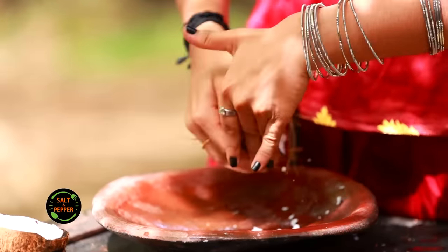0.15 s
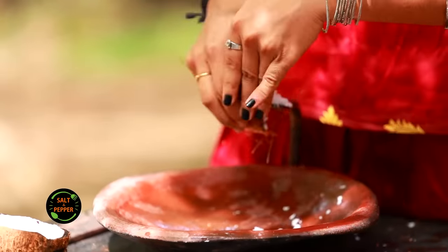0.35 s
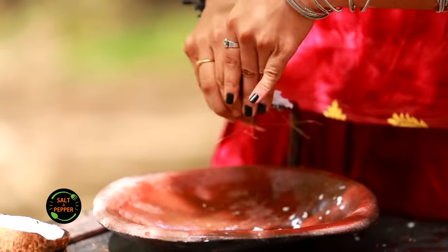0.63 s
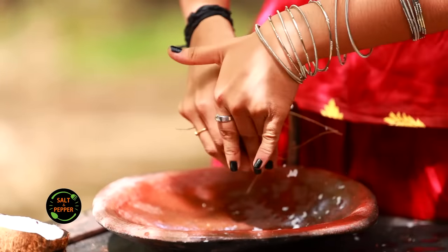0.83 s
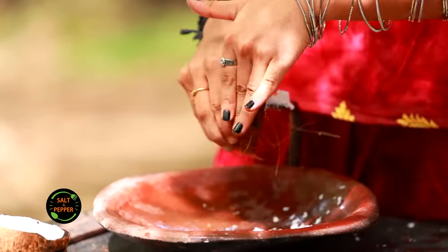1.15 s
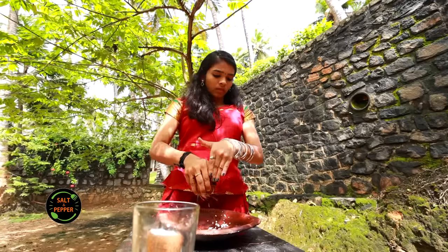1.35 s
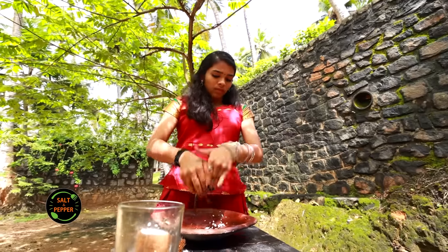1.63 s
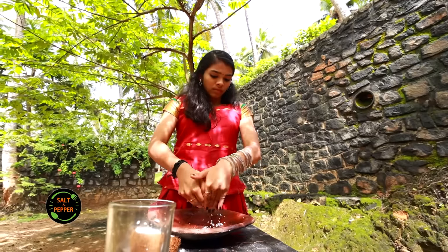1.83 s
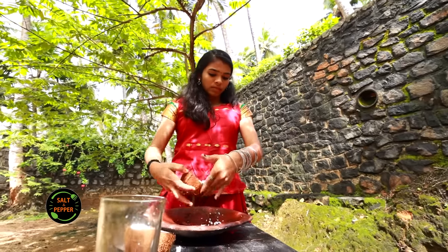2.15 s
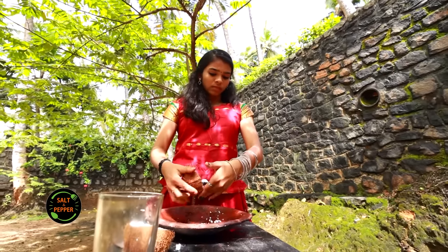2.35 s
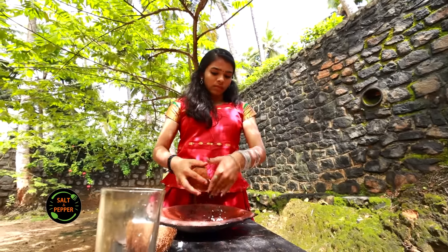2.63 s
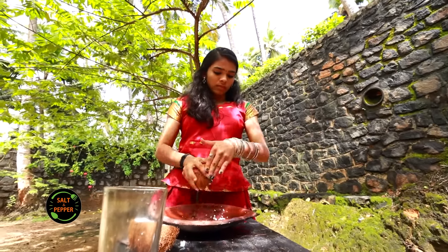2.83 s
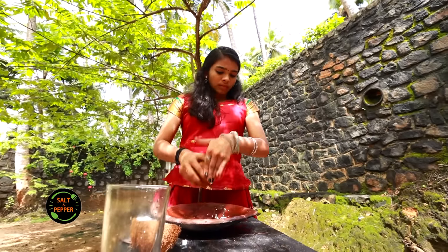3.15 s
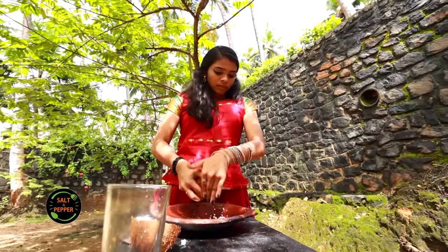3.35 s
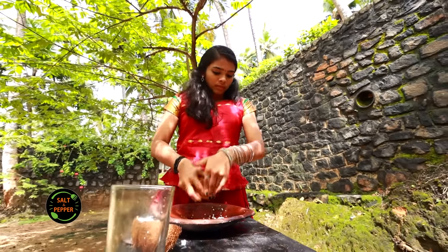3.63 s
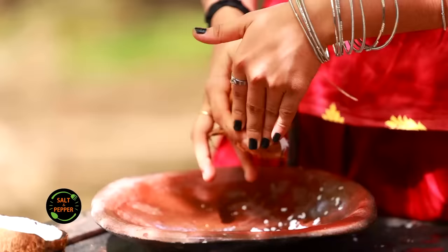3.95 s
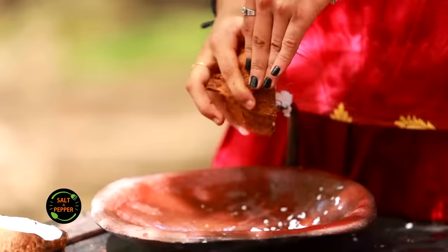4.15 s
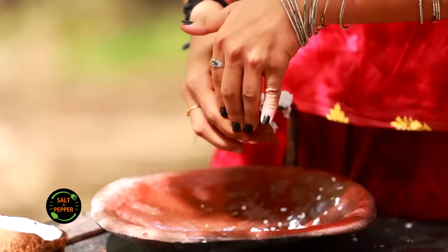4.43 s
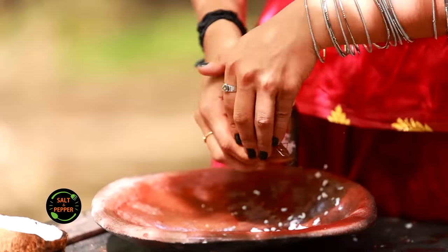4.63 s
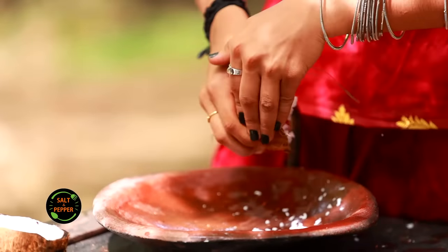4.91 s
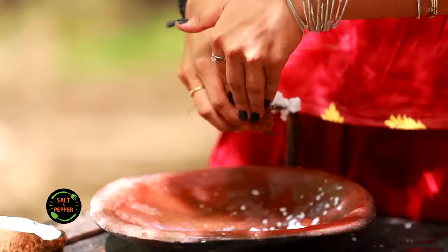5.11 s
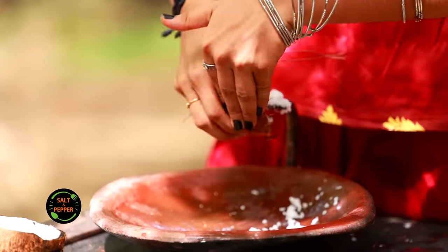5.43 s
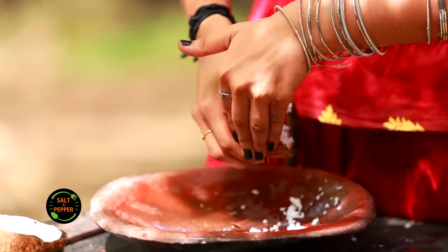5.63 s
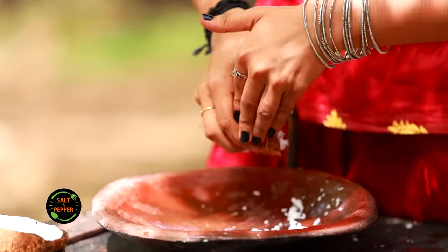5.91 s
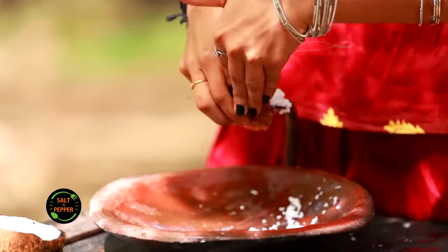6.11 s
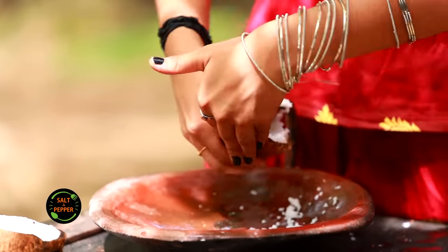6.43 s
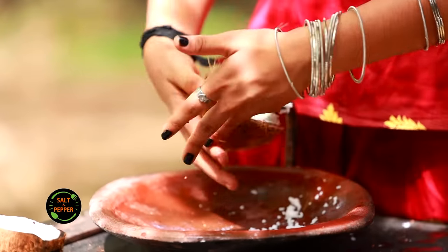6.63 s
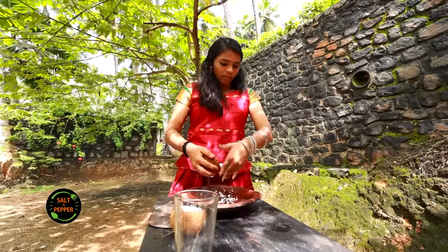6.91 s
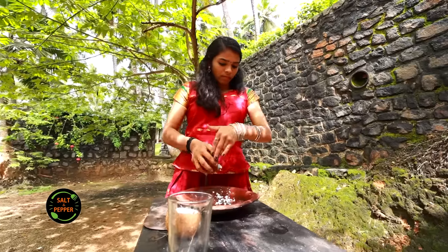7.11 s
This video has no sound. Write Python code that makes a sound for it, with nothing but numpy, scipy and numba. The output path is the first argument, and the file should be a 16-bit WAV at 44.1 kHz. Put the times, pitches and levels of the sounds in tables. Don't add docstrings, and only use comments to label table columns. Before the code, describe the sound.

A close, dry outdoor sound of coconut scraping, with a faint, wide garden hum and leaf hiss behind. From the start dry husk crackles under busy hands, and a faint far bird note sounds. By 0.2 seconds thin bangles clink and the first toothed scrape tears the flesh, ringing the hollow shell and more lightly the steel blade. Short rough strokes follow about every third of a second until 1.95, with low board thuds and high jingling. A distant bird whistles in sliding notes from 1.2 to 2.6. From 2.2 to 3.0 the pushing rests, with only weak clinks and finger rustles. Three strong strokes return at 3.05 to 3.8; a new grip rustles at 4.2. Brisk scraping and jingling continue from 4.3 to 6.5. At 6.55 the shell knocks dryly on steel, bangles tinkle out, and fingers rustle last around 7.2.

```python
import sys
import numpy as np
from scipy import signal
from scipy.fft import rfft, irfft, next_fast_len
from scipy.io import wavfile
from scipy.ndimage import uniform_filter1d
from numba import njit

SR = 44100
rng = np.random.default_rng(int(sys.argv[2]) if len(sys.argv) > 2 else 0)


def dump_mix(stems):
    frames = np.atleast_2d(stems).T
    limited = np.clip(frames, -1, 1)
    pcm = np.round(limited * 32767).astype(np.int16)
    wavfile.write(sys.argv[1], SR, pcm)


def boost_factor(decibels):
    exponent = np.asarray(decibels, float) / 20
    return 10 ** exponent


N = 320166
STEP = 1024


def curve(rows, outside=-120):
    s, *columns = np.transpose(rows)
    span = np.arange(int(s[0] * SR), min(int(s[-1] * SR) + 1, N))
    out = np.full((len(columns), N), 1. * outside)
    out[:, span] = [np.interp(span / SR, s, c) for c in columns]
    return out


def unit(x):
    return x / np.sqrt(np.mean(x ** 2))


def colour(x, points):
    hz, db = np.transpose(points)
    size = next_fast_len(N, True)
    f = np.maximum(np.arange(size // 2 + 1) * SR / size, 1)
    gain = boost_factor(np.interp(np.log(f), np.log(hz), db))
    return irfft(rfft(x, size) * gain, size)[:N]


def grains(per_s, spread_db):
    at = np.flatnonzero(rng.random(N) < per_s / SR)
    out = np.zeros(N)
    out[at] = rng.choice([-1, 1], len(at)) * boost_factor(spread_db * rng.standard_exponential(len(at)))
    return out


def flutter(per_s):
    k = int(SR / per_s)
    steps = np.repeat(rng.standard_normal(N // k + 1), k)[:N]
    return unit(uniform_filter1d(steps, k))


def held(steps):
    count = N // STEP + 1
    values = np.repeat(rng.standard_normal(count), steps)[:count]
    return np.roll(values, rng.integers(steps))


@njit
def ring(force, pole, gain, step):
    out, z = np.empty(len(force)), 0j
    for i in range(len(force)):
        z = z * pole[i // step] + force[i] * gain[i // step]
        out[i] = z.imag
    return out


def mode(x, hz, width_hz, drift=0., grip_db=0., vary_db=0.):
    moving_hz = hz * (1 + drift * held(2))
    moving_width = width_hz * boost_factor(grip_db * held(2))
    pole = np.exp((2j * moving_hz - moving_width) * np.pi / SR)
    return ring(x, pole, boost_factor(vary_db * held(2)), STEP)


def body(x, modes, drift=.015, vary_db=1.6, lift=lambda hz: 1):
    out = np.zeros(N)
    for k, (hz, width, db) in enumerate(modes):
        sound = mode(x * lift(hz), hz, width, drift, 1.96, vary_db)
        out += (-1) ** k * boost_factor(db) * width * sound
    return unit(out)


# pitch_hz [Hz], level_db [dB per Hz]
GARDEN_COLOUR = [(12, -37), (20, -9.5), (154, 3), (357, -10), (499, -17.5), (590, -9.5), (897, -10.5),
                 (1150, -19.5), (2080, -29.5), (6540, -30), (9400, -41), (11800, -39), (16000, -44)]
# time_s [s], level_db [dB]
GARDEN_SWELL = [(0.0, -59), (1.29, -61.5), (3.66, -60.5), (5.03, -62), (5.5, -61), (6.35, -64), (7.26, -59)]
# pitch_hz [Hz], side_minus_mid_db [dB]
GARDEN_WIDTH = [(25, -20), (120, -12), (700, -2), (3000, -2), (9000, 0), (14000, -1)]


def garden():
    swell, = curve(GARDEN_SWELL, outside=GARDEN_SWELL[-1][1])
    gain = boost_factor(-52.5 + 1.03 * (swell - swell.mean()) + 0.091 * flutter(6.6))
    mid, other = (unit(colour(rng.standard_normal(N), GARDEN_COLOUR)) for _ in range(2))
    side = 0.12 * mid + colour(other, GARDEN_WIDTH)
    return gain * np.array([mid + side, mid - side])


# time_s [s], pitch_hz [Hz], level_db [dB]
BIRD_NOTES = [
    [(1.2, 4970, -58), (1.27, 4660, -44), (1.38, 4330, -60), (1.48, 4070, -61), (1.8, 3920, -55),
     (1.85, 3900, -77)],
    [(1.52, 2840, -88), (1.62, 3166, -48), (1.8, 3110, -60), (1.84, 3150, -77)],
    [(1.2, 3390, -47.5), (1.32, 3560, -77), (1.5, 3430, -87)],
    [(0, 2830, -57), (.12, 2600, -59), (.2, 2700, -83)],
    [(2.0, 2760, -63), (2.08, 2878, -71), (2.45, 2740, -77), (2.6, 2780, -93)],
]


def bird():
    out = np.zeros(N)
    for note in BIRD_NOTES:
        hz, db = curve(note)
        hz = np.abs(hz) * (1 + .005 * flutter(80))
        out += boost_factor(db + 3.4 * flutter(39.9)) * np.sin(2 * np.pi * np.cumsum(hz) / SR)
    lag = np.arange(SR // 2) / SR
    echoes = rng.standard_normal(len(lag)) * np.exp(-lag / 0.12)
    return boost_factor(-4) * out + boost_factor(-37) * signal.fftconvolve(out, echoes)[:N]


# time_s [s], husk_crackle_db [dB]
BUSY_HANDS = [(0, -58), (.3, -53), (1.25, -54.5), (1.37, -61), (1.5, -61), (1.7, -53), (1.96, -54.5),
              (2.3, -65.5), (2.92, -70), (3.21, -52.5), (3.92, -55), (4.12, -75), (4.2, -61.5),
              (4.6, -53.5), (6.3, -53.5), (6.62, -58.5), (6.9, -74), (7.26, -64.5)]


def busy_hands():
    level_db, = curve(BUSY_HANDS, outside=BUSY_HANDS[-1][1])
    return level_db


# pitch_hz [Hz], width_hz [Hz], level_db [dB]
FIBRES = [(4530, 1410, -3.5), (6480, 1780, 0), (8160, 2250, 2.5), (10820, 2750, 1.5), (12680, 2670, -3),
          (14000, 1700, -9)]


def crackle(db, rough_db):
    snaps = unit(grains(2800, 1.87)) * boost_factor(rough_db * flutter(50))
    thin = signal.butter(3, 2800, "high", fs=SR, output="sos")
    patchy = body(snaps, FIBRES, drift=.03, vary_db=1.2)
    return unit(signal.sosfilt(thin, patchy)) * boost_factor(db + 8.0)


# start_s [s], crackle_db [dB]
RUSTLES = [
    (2.72, -54),
    (2.82, -56),
    (2.96, -75),
    (4.185, -50),
    (7.04, -58),
    (7.206, -48),
]


def grip():
    s, db = np.transpose(RUSTLES)
    push, lag = np.zeros(N), np.arange(SR // 4) / SR
    push[(s * SR).astype(int)] = boost_factor(db)
    rise_s, fade_s = 0.018, 0.027
    shape = (1 - np.exp(-lag / rise_s)) * np.exp(-lag / fade_s)
    return np.abs(signal.fftconvolve(push, shape)[:N])


def husk(crackle_db):
    return boost_factor(-0.5) * crackle(0, 1.95) * (boost_factor(crackle_db) + grip())


# start_s [s], tick_db [dB], then ring_db [dB] of the third, second and first mode order
CLINKS = [(0.147, -31, -46, -37, -36.5), (0.178, -15, -41, -43, -31), (0.237, -30, -47, -43, -50),
          (0.3282, -30, -43, -44, -55), (0.3551, -34, -44, -48, -41), (0.4577, -19, -37, -34.5, -35),
          (0.62, -27, -40, -39, -52), (0.6574, -27, -35, -36, -50), (0.9497, -27, -35.5, -38, -38),
          (1.0753, -29, -42, -47, -60), (1.1353, -25, -38, -42, -46), (1.1593, -24, -39, -43, -52),
          (1.2177, -20, -33, -32, -53), (1.3287, -30, -35.5, -45, -54), (1.438, -34, -51, -56, -68),
          (1.512, -32, -46, -52, -44), (1.5464, -22, -38, -49, -36), (1.8218, -22, -38, -34, -35),
          (1.9964, -29, -38, -41, -54), (2.0398, -27, -36, -31, -32.5), (2.1175, -32, -41, -42, -56),
          (2.203, -40, -64, -54, -63), (2.3431, -44, -68, -57, -66), (2.5915, -37, -64, -59, -64),
          (2.8105, -33, -55, -52, -59), (2.9447, -46, -68, -66, -59), (3.0315, -33, -63, -45, -44),
          (3.1725, -18, -45, -42, -53), (3.1996, -27, -46, -50, -59), (3.2146, -26, -38, -33, -36),
          (3.269, -20, -41, -41, -43), (3.3388, -21, -50, -41, -41), (3.3707, -26, -41, -32.5, -42),
          (3.5505, -17, -37, -32, -36), (3.5877, -23, -36, -32, -41)]
LATER_CLINKS = [(3.5886, -20, -36, -30, -44), (3.6697, -24, -37, -35, -41), (3.8592, -29, -37, -40.5, -50),
                (4.1601, -43, -62, -53, -62), (4.1875, -38, -47, -57, -56), (4.2953, -38, -50, -45, -52),
                (4.404, -30, -41, -38, -38), (4.5108, -23, -34, -35.5, -49), (4.6335, -22, -36, -35, -44),
                (4.6659, -16, -32, -34, -38), (4.8817, -24, -38.5, -36, -41), (5.177, -14, -33, -31, -43),
                (5.2925, -25, -42, -39, -41), (5.3134, -23, -47, -44, -39), (5.3733, -29, -54, -47, -44),
                (5.464, -20, -37, -33.5, -54), (5.509, -26, -37, -32, -47), (5.8128, -33, -47, -42, -53),
                (5.951, -21, -46, -41, -27.5), (5.988, -24, -45, -33, -47), (6.0165, -21, -37, -35, -44),
                (6.0607, -28, -49, -46, -44), (6.1377, -30, -54, -45, -53), (6.178, -24, -34, -33, -41),
                (6.3137, -29, -50, -41, -39), (6.3845, -28, -39, -43, -46), (6.504, -28, -46, -45, -53),
                (6.5652, -26, -35, -36, -51), (6.587, -25, -31, -33.5, -39.5), (6.7455, -40, -52, -52, -57),
                (6.7593, -20, -49, -45, -56), (6.793, -21, -61, -49, -54), (7.036, -39, -59, -63, -65)]
# start_s [s], peak_db [dB], colour_hz [Hz]
TAPS = [(0.7626, -24, 6400), (0.777, -21, 6340), (0.917, -43, 11500), (1, -26, 11500), (1.2404, -18, 11400),
        (1.255, -20, 11600), (1.3177, -34, 11600), (1.7175, -38, 8040), (1.8115, -28, 8280),
        (2.0696, -19, 11600), (2.1564, -35, 11500), (3.0968, -34, 4130), (3.1263, -27, 7600),
        (3.3232, -37, 8130), (3.5224, -28, 7870), (3.7593, -15, 8150), (3.869, -36, 8120),
        (4.321, -25, 6450), (4.5205, -22, 11900), (4.568, -20, 11500), (4.849, -28, 11600),
        (4.984, -23, 4200), (5.2087, -29, 8140), (5.2194, -30, 7900), (5.391, -34, 4140),
        (5.5484, -30, 7850), (5.6027, -29, 11500), (5.6275, -28, 6490), (5.7183, -19, 11400),
        (5.8989, -31, 8060), (5.9293, -29, 8080), (5.9509, -18.5, 5300), (5.9683, -27, 4340),
        (6.1218, -27, 8020), (6.1663, -24, 11900), (6.2501, -25, 11400), (6.3419, -29, 8500),
        (7.2065, -45, 7900), (7.224, -31, 11600)]
# pitch_hz [Hz], level_db [dB]
RINGS = [
    [(11480, -3), (11530, 0), (11580, 0), (11640, 0), (11920, -5), (12050, -6), (12280, -5), (12560, -6)],
    [(7710, -8), (7870, -4), (8050, 0), (8110, -1), (8215, -2), (8290, -3), (8400, -5)],
    [(4985, -2), (5110, -5), (5230, 0)],
    [(15000, -2), (15230, 0), (15350, -2), (15530, -1)],
]
RING_FALL_S = (0.11, 0.097, 0.11, 0.099)


def bangles(crackle_db):
    rows = np.array([*CLINKS, *LATER_CLINKS])
    bounce = np.cumsum(rng.random((len(rows), 4)), axis=1)
    bounce_s = 0.028 * (bounce - bounce[:, :1])
    at = ((rows[:, :1] + bounce_s) * SR).astype(int)
    fade = boost_factor(-5.0 * np.arange(4))
    third_db, second_db, first_db = rows[:, 2], rows[:, 3] - 1.5, rows[:, 4] - 1.5
    order_db = [third_db, second_db, first_db, third_db - 10]

    chatter_db = -49 + 1.96 * (crackle_db + 51.5) + 0.61 * flutter(8)
    chatter = unit(grains(220, 2.95)) * boost_factor(chatter_db)
    s, tap_db, _ = np.transpose(TAPS)
    rattle = chatter.copy()
    rattle[(s * SR).astype(int)] = boost_factor(tap_db + 3.5)
    loose = np.flatnonzero(rattle)

    out = np.zeros(N)
    for modes, db, fall_s, loose_db in zip(RINGS, order_db, RING_FALL_S, (-26.5, -27.5, -33.5, -35)):
        share = rng.standard_normal((len(rows), 4, len(modes)))
        share[:, 0] /= np.sqrt(np.mean(share[:, 0] ** 2, axis=1, keepdims=True))
        for k, (hz, mode_db) in enumerate(modes):
            force = np.zeros(N)
            force[loose] = rattle[loose] * boost_factor(loose_db) * rng.standard_normal(len(loose))
            force[at] += boost_factor(db[:, None] - 5.0) * fade * share[:, :, k]
            width_hz = np.log(1000) / (np.pi * fall_s)
            out += boost_factor(mode_db) * mode(force, hz, width_hz, 0.0042, 4)

    tick = chatter * boost_factor(-25)
    tick[at] += boost_factor(rows[:, 1:2] + 8) * fade ** 3
    rasp = rng.standard_normal(128) * np.exp(-np.arange(128) / 22) * 1.1
    rasp = signal.sosfilt(signal.butter(2, 11500, fs=SR, output="sos"), rasp)
    thin = signal.butter(4, 4400, "high", fs=SR, output="sos")
    return signal.sosfilt(thin, out + np.convolve(tick, rasp / 4)[:N])


def taps():
    out, lag = np.zeros(N), np.arange(256) / SR
    for s, db, hz in TAPS:
        rasp = rng.standard_normal(256) * np.exp(-lag / 0.00092)
        edges = np.clip([hz * 0.9, hz * 1.1], 2000, 16000)
        click = signal.sosfilt(signal.butter(1, edges, "band", fs=SR, output="sos"), rasp)
        out[int(s * SR):][:256] += boost_factor(db - 6) * click / np.abs(click).max()
    return out


# start_s [s], hold_s [s], first_db [dB], last_db [dB], blade_minus_shell_db [dB]
STROKES = [(0.19, 0.16, -25.5, -53, -5.5), (0.493, 0.056, -19, -18.5, -10.5),
           (0.796, 0.075, -16, -26.5, -13), (1.168, 0.061, -27.5, -42.5, -9.5),
           (1.536, 0.049, -29, -21, -8.5), (1.864, 0.084, -19.5, -41.5, -5),
           (3.047, 0.097, -24.5, -24.5, -10.5), (3.375, 0.098, -20, -25.5, -12.5),
           (3.681, 0.087, -19.5, -29.5, -10), (4.34, 0.11, -26.5, -30.5, -8.5),
           (4.674, 0.1, -15.5, -35, -8.5), (4.989, .14, -18, -34.5, -9), (5.317, 0.13, -24.5, -32.5, -8.5),
           (5.665, 0.059, -21, -39, -7), (5.725, 0.046, -26, -30, -9.5), (5.999, 0.0098, -14.5, -22, -11.5),
           (6.076, 0.031, -28, -28.5, -10.5), (6.328, 0.007, -22, -28.5, -9.5),
           (6.404, 0.063, -28.5, -42.5, -4.5)]
# start_s [s], pressure_db [dB], blade_minus_shell_db [dB]
TOUCHES = [
    (0.707, -28.5, -11.5),
    (1.031, -31, -11),
    (1.762, -40.5, -11),
    (2.346, -51, -12),
    (4.22, -41.5, -5),
    (4.563, -42.5, -13),
    (4.9, -46, -10),
    (5.554, -45, -26),
    (6.236, -40, -18),
    (6.56, -32, -8.5),
]
# start_s [s], shell_peak_db [dB], blade_minus_shell_db [dB], fade_s [s]
BITES = [(0.185, -2.5, -12.5, 0.0086), (0.259, -15, -15, 0.01), (0.282, -9.5, -20, 0.0038),
         (0.467, -21.5, -14, 0.011), (0.505, -36, 1, 0.0067), (0.521, -30, -10, 0.011),
         (0.792, -33, 5.5, 0.0077), (1.159, -2.5, -12.5, 0.013), (1.549, -19.5, -4.5, 0.029),
         (1.825, -21.5, -12, 0.02), (1.849, -11, -50, 0.017), (3.05, -26, -26, 0.022),
         (5.397, -11.5, -11, 0.0096), (3.354, -10, -24, 0.016), (3.695, -1, -38, 0.005),
         (3.734, -7, -21.5, 0.018), (4.342, -17, -4.5, 0.0066), (4.383, -21.5, -7.5, 0.05),
         (4.644, -18, -21, 0.013), (4.672, -18, -9, 0.023), (5.05, -12.5, -8.5, 0.013),
         (5.32, -13.5, -9, 0.01), (5.331, -6, -18, 0.01), (5.664, -5, -28, 0.0066),
         (5.73, -15, -10.5, 0.016), (5.997, -20.5, -11, 0.0063), (6.061, -18, -6, 0.013),
         (6.313, -7.5, -18, 0.0069), (6.335, -9.5, -13, 0.0048), (6.403, -15, -32, 0.012),
         (0.493, -19, -9, 0.0066), (0.806, -14, -15, 0.0065), (.847, -18.5, -21, 0.0061),
         (1.577, -23.5, -14, 0.0049), (3.069, -12, -25, 0.0067), (3.117, -18, -16, 0.0091),
         (3.416, -29, -18, 0.0058), (4.398, -22, -15, .008), (4.438, -17, -23, 0.019),
         (4.694, -10.5, -11.5, 0.011), (4.765, -20.5, -18, 0.011), (5.012, -17, -11, 0.006),
         (5.102, -19.5, -19, 0.014), (5.381, -20, 0, 0.005), (5.432, -14.5, -17, 0.0076),
         (5.651, -13.5, -20, .008), (5.972, -17.5, -15, 0.007), (6.324, -8.5, -27, 0.0043),
         (6.46, -27, -15, 0.0042)]
# start_s [s], blade_peak_db [dB], fade_s [s]
NICKS = [
    (2.835, -30, 0.023),
    (2.947, -36, 0.032),
    (4.16, -37, 0.014),
    (4.637, -28, 0.0089),
    (.18, -29, 0.011),
    (5.952, -38, 0.0059),
    (3.342, -21.5, 0.0088),
]


def pressure():
    shell, blade = np.zeros(N), np.zeros(N)
    lag = np.arange(-SR // 8, SR // 3) / SR
    touches = [(s, .003, db, db, more_db) for s, db, more_db in TOUCHES]
    attack_db_s, release_db_s = 863, 544
    for s, hold, first, last, more_db in [*STROKES, *touches]:
        hold = max(hold, .002)
        held_db = first + (last - first) * np.clip(lag / hold, 0, 1)
        edge_db = attack_db_s * np.minimum(lag, 0) - release_db_s * np.maximum(lag - hold, 0)
        start = int(s * SR) - SR // 8
        span = slice(start, start + len(lag))
        shell[span] += boost_factor(held_db + edge_db - 5.5)
        blade[span] += boost_factor(held_db + 0.83 * edge_db + more_db - 3.5)

    lag = np.arange(SR // 10) / SR
    nicks = [(s, db - 23.5, 20, fade) for s, db, fade in NICKS]
    for s, db, more_db, fade in [*BITES, *nicks]:
        shape = boost_factor(db - 7.5) * (1 - np.exp(-lag / 0.0022)) * np.exp(-lag / max(fade, .002))
        shell[int(s * SR):][:len(lag)] += shape
        blade[int(s * SR):][:len(lag)] += shape * boost_factor(more_db)
    return np.roll([shell, blade], -int(0.0043 * SR), axis=1)


# start_s [s], lower_modes_db [dB], upper_modes_db [dB]
GRIPS = [(0, 0.5, 0), (.4, -2.5, 1), (.75, -1, -1.5), (1.1, -1.5, -2), (1.45, 0.5, -1.5), (1.8, -0.5, -0.5),
         (2.9, 1, -1.5), (3.3, 1.5, -0.5), (3.64, -4, -2), (3.72, -1.5, -3), (4.3, -2.5, 1), (4.6, 1, 1),
         (4.94, 0, 1.5), (5.26, -0.5, 0.5), (5.62, 7, 1), (5.705, 0, 0.5), (5.94, 0.5, -2.5),
         (6.05, 5, -1.5), (6.28, -1.5, 3.5), (6.38, 1, -3.5)]


def cupped(hz):
    s, lower_db, upper_db = np.transpose(GRIPS)
    db = lower_db * (550 < hz < 700) + upper_db * (900 < hz < 1200)
    return boost_factor(db)[np.searchsorted(s, np.arange(N) / SR, side="right") - 1]


# pitch_hz [Hz], width_hz [Hz], level_db [dB]
SHELL = [(410.5, 25, -13.5), (484, 46, -11.5), (632.7, 50, -4.5), (736, 143, -6.5), (819.5, 43, 3),
         (964, 41.8, -3), (1060, 57, -5.5)]
# pitch_hz [Hz], width_hz [Hz], level_db [dB]
BLADE = [(1383, 250, -5), (1533, 226, -1), (1789, 86, 2), (2045, 110, 3.5), (2210, 510, -3), (2990, 300, 1),
         (3372, 182, 5.5), (3845, 200, 3), (4224, 152, 2), (5550, 1430, -5)]


def scraping():
    shell_push, blade_push = pressure()
    catch = boost_factor(1.33 * flutter(90))
    shell_slips = unit(grains(2501, 1.64) * catch)
    blade_slips = unit(grains(1504, 1.73) * catch)

    def driven(slips, push, modes):
        return body(slips * push, modes, lift=cupped) * np.sqrt(np.mean(push ** 2))

    soft = signal.butter(4, 1250, fs=SR, output="sos")
    cavity = signal.sosfilt(soft, driven(shell_slips, shell_push, SHELL))
    steel = driven(blade_slips, blade_push, BLADE)
    tearing = blade_push * crackle(0, 2.6)
    return boost_factor(1.4) * cavity + boost_factor(1.5) * steel + boost_factor(-12.0) * tearing


# start_s [s], peak_db [dB], length_s [s]
THUDS = [(0.249, -39.5, 0.057), (3.066, -38.5, 0.068), (0.531, -35, 0.047), (0.791, -28, 0.077),
         (1.557, -32, 0.049), (1.855, -23, 0.056), (3.358, -23.5, 0.058), (3.713, -24.5, 0.029),
         (4.331, -31.5, 0.076), (4.675, -35, 0.056), (5.05, -27.5, 0.013), (5.328, -32, 0.074),
         (5.55, -38, 0.032), (5.674, -43.5, 0.096), (5.722, -40, 0.039), (6.076, -35.5, 0.041),
         (6.329, -32, 0.037)]
# pitch_hz [Hz], width_hz [Hz], level_db [dB]
BOARD = [(172, 33, 0.5), (212, 53, -5), (368, 69, -9.5)]


def board():
    push, lag = np.zeros(N), np.arange(SR // 5) / SR
    for s, db, length in THUDS:
        shape = np.exp(-4 * (lag / max(length, .005) - .6) ** 2)
        push[int(s * SR):][:len(lag)] += boost_factor(db) * shape
    thud = body(push * rng.standard_normal(N), BOARD, vary_db=1.0)
    return boost_factor(-3.5) * thud * np.sqrt(np.mean(push ** 2))


# start_s [s], level_db [dB]
KNOCK = (6.552, -27)
# pitch_hz [Hz], level_db [dB], fall_s [s] to fall by 60 dB
KNOCK_MODES = [(820, 3.5, 0.074), (1090, 1, 0.07), (1270, -20, 0.15), (1820, -1, 0.065), (2600, -12, 0.04),
               (3340, -52, 0.54)]


def knock():
    start_s, level_db = KNOCK
    tap, out = np.zeros(N), np.zeros(N)
    tap[int(start_s * SR)] = boost_factor(level_db)
    for hz, db, fall_s in KNOCK_MODES:
        out += boost_factor(db) * mode(tap, hz, np.log(1000) / (np.pi * fall_s))
    return out


def scene():
    crackle_db = busy_hands()
    near = bird() + husk(crackle_db) + bangles(crackle_db) + taps()
    near = near + scraping() + board() + knock()
    low_cut = signal.butter(3, 110, "high", fs=SR, output="sos")
    wind_cut = signal.butter(3, 40, "high", fs=SR, output="sos")
    return signal.sosfilt(low_cut, near) + signal.sosfilt(wind_cut, garden())


def band_limit(x):
    return signal.sosfilt(signal.butter(12, 15830, fs=SR, output="sos"), x)


def record(dry):
    top = signal.ellip(10, .2, 80, 15700, fs=SR, output="sos")
    mix = signal.sosfilt(top, dry)
    return band_limit(mix)


dry = scene()
out = record(dry)
dump_mix(out)
```